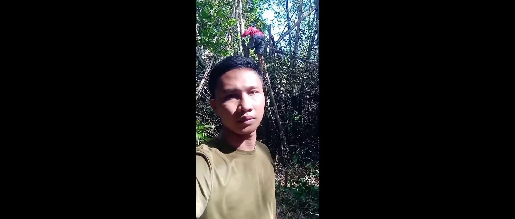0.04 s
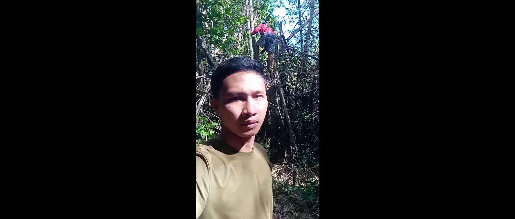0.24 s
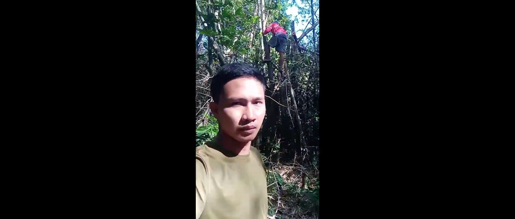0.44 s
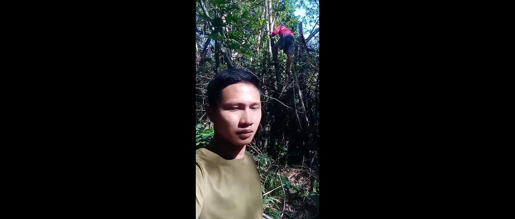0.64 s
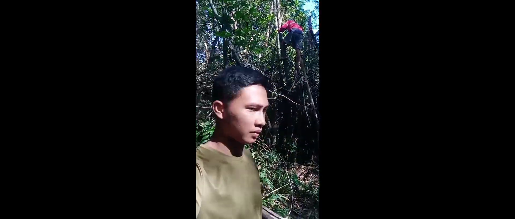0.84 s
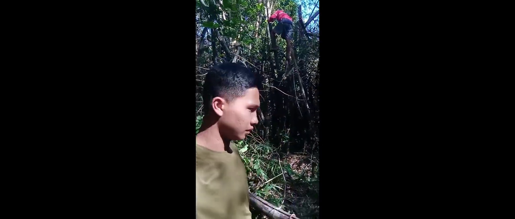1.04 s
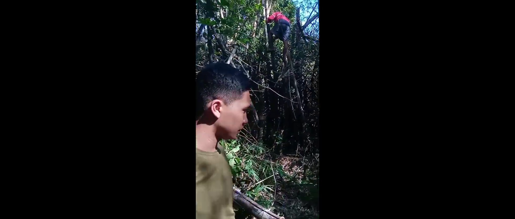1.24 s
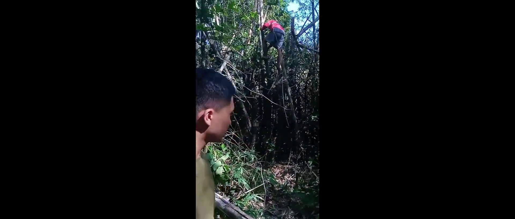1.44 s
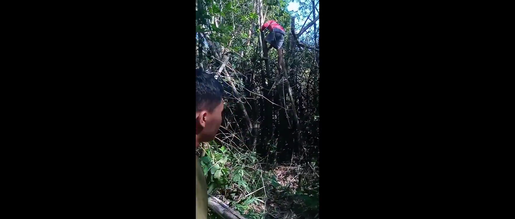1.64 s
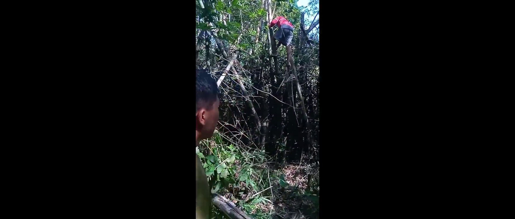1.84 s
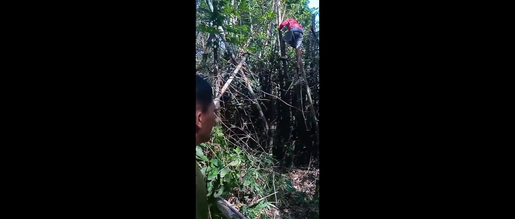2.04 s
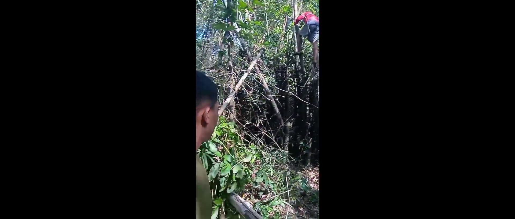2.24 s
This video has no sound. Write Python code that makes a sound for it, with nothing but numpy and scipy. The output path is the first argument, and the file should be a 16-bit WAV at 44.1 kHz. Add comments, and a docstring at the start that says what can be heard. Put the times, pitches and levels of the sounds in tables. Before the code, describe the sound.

Machete chopping bamboo in a thicket, close microphone. Faint leaf rustle, then a very loud hollow crack at 0.25 s, a brief splitting rattle and woody rub until 0.5, and loose canes knocking at 0.53-0.7. A second crunchy double chop lands at 0.89, a twig snaps at 1.18, a third chop at 1.43, a dry click at 1.55. Short echoes follow; small snaps and leaves swell around 2.1-2.3.

```python
"""Outdoors in a bamboo thicket, three machete chops land, loud enough to touch the recorder's limiter.
Each blow is a run of tiny cracks, made of random clicks and noise, that rings the hollow stem.
The first stem then splits and rubs; the thicket answers with close echoes and a spread-out tail.
Loosened canes knock, twigs snap and dry clicks sound close by; rustling leaves are showers of ticks,
distant foliage is coloured noise, and tapping stalks are short fading notes."""
import sys
import numpy as np
from scipy import signal
from scipy.io import wavfile
from scipy.ndimage import uniform_filter1d, minimum_filter1d

SR = 44100
rng = np.random.default_rng(int(sys.argv[2]) if len(sys.argv) > 2 else 0)


def to_wav(s):
    """Save 16-bit WAV."""
    ch = np.atleast_2d(s).T  # columns
    pcm = np.round(np.clip(ch, -1, 1) * 32767)  # PCM
    wavfile.write(sys.argv[1], SR, pcm.astype(np.int16))


N = 101429  # samples in the scene

# How loud the leaf rustle is over time: (time [s], level [dB])
RUSTLE_LEVEL = [(0, -43.5), (.2, -42), (.45, -35), (.75, -48.5), (1.0, -41), (1.15, -49), (1.38, -47),
                (1.58, -44.5), (1.72, -46.5), (1.84, -43.5), (2.0, -50), (2.13, -42.5), (2.219, -35.5),
                (2.3, -39.5)]
# Tone colour of the leaf rustle: (frequency [Hz], level [dB])
RUSTLE_COLOUR = [(60, -41.5), (500, -7.5), (1500, 0), (3000, 0.5), (4500, -1.5), (5800, -4), (7500, -25),
                 (10000, -23), (16000, -44)]
# Tone colour of the distant foliage: (frequency [Hz], level [dB])
FOLIAGE_COLOUR = [(25, -8), (60, -38), (100, -28), (170, -9.5), (300, -12.5), (550, -6.5), (950, -6),
                  (1500, -8), (2800, -4.5), (5200, -6), (7500, -28), (10000, -27), (13000, -33),
                  (16000, -58)]
# What each stem, twig or leafy crown rings with:
# (frequency [Hz], width [Hz], height over the broad colour [dB])
STEM_RINGS = { "first": [(847, 43, 3), (1340, 18, 6), (1972, 18, 10), (3120, 260, -3.5), (3605, 34, 1),
              (3930, 35, 3), (4270, 36, 4.5), (5500, 220, 3.5)], "second": [(1750, 300, 9), (2600, 260, 9)],
              "second, split open": [(913, 22, 12), (1740, 250, 7), (2585, 120, 9), (2860, 60, 8.5),
              (3903, 70, 7.5), (4130, 52, 5), (4600, 140, 11.5), (5010, 180, 12.5)],
              "third": [(1710, 92, 6), (2530, 200, 11), (4140, 160, 8), (4900, 200, 8.5)],
              "third, split open": [(1670, 120, 10.5), (2780, 130, 6.5), (5020, 110, 12)],
              "loose": [(920, 68, 13), (1348, 53, 15.5), (1720, 63, 11.5), (2170, 130, 13), (2860, 92, 9.5),
              (3770, 150, 9)], "twig": [(2880, 100, 6), (3840, 400, 4), (4940, 560, 3.5)],
              "shoot": [(2795, 130, 19)], "crown": [(4450, 380, 6), (5220, 330, 10.5)]}
# Broad colour of breaking bamboo: (frequency [Hz], level [dB])
BAMBOO_COLOUR = [(30, -41), (100, -28.5), (250, -20), (500, -12), (900, -8.5), (1700, -1.5), (3000, 1),
                 (4200, 2), (5300, -3), (6200, -6.5), (7600, -24), (9000, -22), (13000, -35.5),
                 (16000, -49)]
# Loose canes knocking and twigs snapping, plus a soft low rustle near 1.9 s (the row at 1.898 s): # (time [s],
# level [dB], hold [s], fade by 60 dB [s], bass [dB], top treble [dB], stem name)
SNAPS = [ (0.106, -39, 0.0097, 0.052, 5, 3, "loose"), (0.5270, -23, 0.0039, 0.028, -6, 0, "loose"),
         (0.538, -29.5, 0.014, 0.05, 1.5, -6, "loose"), (0.5787, -29, 0.0022, 0.014, 2, -3, "loose"),
         (0.586, -29.5, 0.0026, 0.055, 2, -8, "loose"), (0.644, -28, 0.0019, .016, 4, -18, "loose"),
         (0.6544, -26.5, 0.0016, 0.062, 1, -23, "loose"), (0.6775, -26.5, 0.0025, 0.018, 3.5, -14, "loose"),
         (0.6856, -28, 0.004, 0.045, 8.5, -14, "loose"), (0.694, -34.5, 0.0066, 0.31, 16.5, -16, "loose"),
         (0.8083, -38, 0.016, 0.035, -21, 1, "twig"), (.8646, -31.5, 0.0035, 0.15, -30, 7, "shoot"),
         (1.043, -35, 0.0055, 0.059, -3, -7, "twig"), (1.0814, -36, 0.02, 0.052, -14, 3, "crown"),
         (1.1780, -24.5, 0.0012, 0.04, 7, -6, "twig"), (1.1920, -39, 0.018, 0.077, 20, -25, "twig"),
         (1.287, -36.5, 0.0058, 0.024, -9, 1, "twig"), (1.617, -40.5, 0.03, 0.018, -7, 9.5, "crown"),
         (1.6545, -28.5, 0.0025, 0.04, 9.5, -14, "twig"), (1.898, -42.5, 0.06, 0.051, 26, -6, "loose"),
         (2.0327, -34, 0.001, 0.08, -20, 1, "crown"), (2.0880, -29, 0.005, 0.05, -6, 2, "twig"),
         (2.1560, -37, 0.013, 0.026, -18, -8, "shoot"), (2.1670, -31.5, 0.0006, 0.012, -10, 1, "twig"),
         (2.1750, -24, 0.0015, 0.03, -1, 6, "twig"), (2.266, -33.5, 0.006, 0.17, 15.5, -10, "loose")]
# Cracks under the blade, and the leafy crowns shaking after the second and third chops (the "crown" rows): #
# (time [s], level [dB], hold [s], fade by 60 dB [s], bass [dB], top treble [dB], stem name)
CHOP_EVENTS = [ (.2402, -19.5, 0.012, 0.03, -7, 5, "first"),
               (0.2540, -5.5, 0.0017, 0.011, 2, 3.5, "first"),
               (0.2573, -7, 0.00064, 0.032, -6.5, 8, "first"),
               (.2620, -21.5, 0.056, 0.08, 2, -0.5, "first"),
               (.3600, -27.5, 0.036, 0.31, 6.5, 0.5, "first"), (0.8924, -8, 0.003, .02, 1, 2.5, "second"),
               (0.8970, -8.5, 0.007, 0.05, 1, -2, "second, split open"),
               (0.9115, -12, 0.0014, 0.068, 9.5, -4, "second, split open"),
               (0.940, -29.5, 0.035, 0.13, 8.5, -5, "crown"),
               (1.4350, -6.5, 0.0051, 0.052, -12, 4, "third"),
               (1.4506, -11, 0.00096, 0.016, 9.5, -10, "third, split open"),
               (1.4545, -21, 0.018, 0.083, 10.5, -4, "third, split open"),
               (1.4595, -18, 0.0007, 0.013, 8.5, -5, "third, split open"),
               (1.474, -27.5, 0.023, 0.069, 2, -7, "crown")]
# Dry clicks close to the microphone:
# (time [s], level [dB], hold [s], fade by 60 dB [s], bass [dB], top treble [dB], stem name)
CLOSE_CLICKS = [(1.4237, -14, 0.0022, 0.008, -15, 9.5, "third"),
                (1.545, -16.5, 0.0005, 0.011, 7, 16, "twig")]
# How long the thicket's tail lasts: (frequency [Hz], fade by 60 dB [s])
# The negative point only steers the curve between its neighbours.
THICKET_FADE = [(150, 1.9), (600, -0.1), (1500, 0.63), (4500, 0.48), (8000, 0.44), (15000, 0.6)]
# Tone colour of the thicket's tail: (frequency [Hz], level [dB])
THICKET_COLOUR = [(60, -26), (160, -4), (500, -4), (1500, -13), (3000, -13.5), (4800, -9), (7000, -9),
                  (15000, -5)]
# Low push of each blow: (time [s], level [dB])
THUMPS = [(0.253, -39), (0.8937, -33), (1.438, -56)]
# The first stem splitting lengthwise: (start time [s], length [s], level [dB])
SPLIT = (.2680, 0.047, -17.5)
# The cut cane rubbing: (time of the peak [s], length [s], level [dB])
RUBS = [(.3020, .055, -24.5), (0.383, .045, -25), (0.425, .06, -34.5), (.5090, .028, -34.5)]

LEAF_TICKS_PER_S, LEAF_SPREAD_DB, LEAF_SWAY_DB = 1900, 3.5, 1.6
AIR_DB, AIR_PATCH_DB = -45, 3.5
TAP_DB, TAP_LOW_HZ, TAP_HIGH_HZ = -46.5, 481.3, 4264
TAPS_PER_S, TAP_SPREAD_DB, TAP_T60_S = 150, 3, 0.06  # T60: time to fade by 60 dB
BASS_HZ, TREBLE_HZ = 1110, 6100
FIBRES_PER_S, FIBRE_SPREAD_DB = 1300, 2.5
TEAR_SHARE, FIRST_FIBRE = 0.47, 1.14  # noise against the clicks; first click against a typical one
ECHO_DB, SNAP_ECHO_DB, ECHO_DELAY_S = -1.5, -3, 0.011
NEAR_DB, NEAR_T60_S, NEAR_ECHOES_PER_S, NEAR_SPREAD_DB = -12.5, 0.1, 780, 8.3
THUMP_HZ, THUMP_T60_S = 60.4, 0.011
SLIP_GAP_S, SLIP_UNEVEN = 0.0056, 0.355  # gap before it is made uneven; share of unevenness
SLIP_HOLD_S, SLIP_T60_S = 0.00054, 0.0072
RUB_HZ, RUB_WIDTH_HZ = 1355, 50
CEILING, LIMIT_S = 0.9, 0.0004  # ceiling as a share of full scale
EDGE_HZ = 15600


def amp(db):
    """Turns decibels into a multiplier."""
    return 10 ** (np.asarray(db) / 20)


def unit(x):
    """Scales a signal to an average strength (rms) of 1."""
    return x / np.sqrt(np.mean(x ** 2) + 1e-20)


def fade(t, t60):
    """Falls smoothly by 60 dB in t60 seconds, as a ringing object does."""
    return np.exp(-np.log(1000) * t / t60)


def read(points, hz):
    """Reads a curve at any frequency, with straight lines on a log-frequency axis."""
    f, value = np.transpose(points)
    return np.interp(np.log(hz + 1), np.log(f + 1), value)


def add(mix, s, sound):
    """Mixes a sound in at time s [s]."""
    part = mix[round(s * SR):][:len(sound)]
    part += sound[:len(part)]


def bins(size=8192):
    """Frequencies [Hz] on which colours are drawn."""
    return np.fft.rfftfreq(size, 1 / SR)


def ring(gain):
    """Turns a colour into the response to one click, starting at once and with unit energy."""
    log_gain = np.log(np.maximum(gain, 1e-6))
    mirrored = np.concatenate([log_gain, log_gain[-2:0:-1]])
    # The Hilbert transform gives the phase that keeps the ring after the click.
    spectrum = np.exp(np.conj(signal.hilbert(mirrored)))
    response = np.fft.ifft(spectrum).real[:len(gain)]
    return response / np.linalg.norm(response)


def ticks(n, per_s, spread_db):
    """Scatters random clicks of uneven size and sign."""
    chance, size, sign = rng.random((3, n))
    size = np.minimum(-np.log(size + 1e-9), 3)  # mostly small, now and then large
    return (chance < per_s / SR) * amp(spread_db * size) * np.sign(sign - 0.5)


def leaves():
    """Dry leaves tick against each other in small uneven swells."""
    slow = uniform_filter1d(rng.standard_normal(N), size=700)
    sway = unit(uniform_filter1d(slow, size=500))
    level = np.interp(np.arange(N) / SR, *np.transpose(RUSTLE_LEVEL)) + LEAF_SWAY_DB * sway
    grains = unit(ticks(N, LEAF_TICKS_PER_S, LEAF_SPREAD_DB)) * amp(level)
    return signal.fftconvolve(grains, ring(amp(read(RUSTLE_COLOUR, bins()))))[:N]


def air():
    """Distant foliage is a wash of noise with patches that drift in time and pitch."""
    hz, _, z = signal.stft(rng.standard_normal(N), SR, nperseg=1024, noverlap=768)
    patches = uniform_filter1d(rng.standard_normal(z.shape), size=6, axis=0)
    patches = unit(uniform_filter1d(patches, size=9, axis=1))
    z = z * amp(read(FOLIAGE_COLOUR, hz)[:, None] + AIR_PATCH_DB * patches)
    wash = signal.istft(z, SR, nperseg=1024, noverlap=768)[1][:N]
    return amp(AIR_DB) * unit(wash)


def taps(count=48):
    """Small dry stalks in the undergrowth are tapped at random, each with its own short note."""
    t, out = np.arange(SR // 10) / SR, np.zeros(N)
    for k, detune in enumerate(rng.random(count)):
        hz = TAP_LOW_HZ * (TAP_HIGH_HZ / TAP_LOW_HZ) ** ((k + detune) / count)
        soft_start = 1 - np.exp(-hz * t)
        note = np.sin(2 * np.pi * hz * t) * fade(t, TAP_T60_S) * soft_start
        out += signal.oaconvolve(ticks(N, TAPS_PER_S / count, TAP_SPREAD_DB), note)[:N]
    return amp(TAP_DB) * unit(out)


def crack(level_db, hold, t60, bass_db, treble_db, stem):
    """One fibre gives way, then a run of others; their clicks and tearing noise ring the stem."""
    t, hz = np.arange(SR // 2) / SR, bins()
    fibres = unit(ticks(len(t), FIBRES_PER_S, FIBRE_SPREAD_DB))
    fibres += TEAR_SHARE * rng.standard_normal(len(t))
    fibres[0] = FIRST_FIBRE * np.sqrt(SR / FIBRES_PER_S)
    shape = amp(-60 * np.maximum(t - hold, 0) / t60)
    drive = fibres * shape
    drive *= np.linalg.norm(shape) / np.linalg.norm(drive)  # same energy for every random draw
    power = 1  # the broad colour, with a peak added for each ring
    for f, width, db in STEM_RINGS[stem]:
        power = power + amp(db) ** 2 / (1 + (2 * (hz - f) / width) ** 2)
    bass = bass_db / (1 + (hz / BASS_HZ) ** 4)
    treble = treble_db / (1 + (TREBLE_HZ / (hz + 1)) ** 6)
    colour = np.sqrt(power) * amp(read(BAMBOO_COLOUR, hz) + bass + treble)
    return amp(level_db) * signal.fftconvolve(drive, ring(colour))


def strikes(table):
    """Plays a table of cracks, each at its own time."""
    out = np.zeros(N)
    for s, *row in table:
        add(out, s, crack(*row))
    return out


def loose_snaps():
    """Loose canes knock and twigs snap, each as a crack with its own ring; a soft low rustle near 1.9 s is
    played the same way."""
    return strikes(SNAPS)


def thicket(x):
    """Quick echoes off the nearest canes and the ground, with a spread-out tail of fading noise."""
    t = np.arange(SR) / SR
    hz, when, z = signal.stft(rng.standard_normal(SR), SR, nperseg=256)
    t60 = read(THICKET_FADE, hz)[:, None]
    even_energy = np.sqrt(2 * np.log(1000) / (t60 * SR))  # long fades gain no extra energy
    z = z * amp(read(THICKET_COLOUR, hz))[:, None] * fade(when, t60) * even_energy
    tail = signal.istft(z, SR, nperseg=256)[1][:SR]
    near = ticks(SR, NEAR_ECHOES_PER_S, NEAR_SPREAD_DB) * fade(t, NEAR_T60_S)
    near = signal.lfilter([0.5, 0.5], [1], near / np.linalg.norm(near))  # softens the treble
    out = np.zeros(N)
    add(out, ECHO_DELAY_S, signal.fftconvolve(x, tail + amp(NEAR_DB) * near))
    return out


def chops():
    """The blade bursts the fibres in runs of cracks that ring the hollow stems; after the second and third
    chops the leafy crowns shake."""
    return strikes(CHOP_EVENTS)


def thumps():
    """A short low push under each chop is a quickly fading low note."""
    t, out = np.arange(SR // 4) / SR, np.zeros(N)
    push = np.cos(2 * np.pi * THUMP_HZ * t) * fade(t, THUMP_T60_S)
    for s, db in THUMPS:
        add(out, s, amp(db) * push)
    return out


def split():
    """The split runs along the first stem in uneven slips, one small crack per slip."""
    start, length, db = SPLIT
    out, s = np.zeros(N), start
    for gap, size in rng.uniform(-1.2, 1, (30, 2)):
        if s < start + length:
            add(out, s, crack(db + 2 * size, SLIP_HOLD_S, SLIP_T60_S, 0, -2.7, "first"))
        s += SLIP_GAP_S * (1 + SLIP_UNEVEN * gap)
    return out


def rubs():
    """The cut cane rubs and sounds its hollow note: a swelling tone with an unsteady phase."""
    out = np.zeros(N)
    for s, length, db in RUBS:
        t = np.arange(0, length, 1 / SR)
        wander = np.cumsum(rng.standard_normal(SR // 4))[:len(t)]
        wander *= np.sqrt(2 * np.pi * RUB_WIDTH_HZ / SR)  # more wander makes a wider note
        phase = 2 * np.pi * RUB_HZ * t + uniform_filter1d(wander, size=60)
        swell = np.sin(np.pi * t / length) ** 2
        add(out, s - length / 2, amp(db) * swell * np.sin(phase))
    return out


def close_clicks():
    """Dry clicks close to the microphone are short cracks, kept out of the echo."""
    return strikes(CLOSE_CLICKS)


def scene():
    """Chops and snaps with their echo in the thicket, over the foliage and close clicks."""
    without_echo = leaves() + air() + close_clicks() + taps()
    cane = chops() + thumps() + split() + rubs()
    snaps = loose_snaps()
    echo = thicket(amp(ECHO_DB) * cane + amp(SNAP_ECHO_DB) * snaps)
    return (cane + snaps + echo + without_echo)[None]


def record(dry):
    """A fast limiter holds down the loudest cracks; then a filter removes the highest treble."""
    size = max(round(LIMIT_S * SR), 3)
    gain = np.minimum(1, CEILING / (abs(dry) + 1e-9))
    smooth_gain = uniform_filter1d(minimum_filter1d(gain, size), size)
    low_pass = signal.firwin(255, EDGE_HZ, window=("kaiser", 9), fs=SR)
    return signal.oaconvolve(dry * smooth_gain, low_pass[None], "same")


dry = scene()
out = record(dry)
to_wav(out)
```